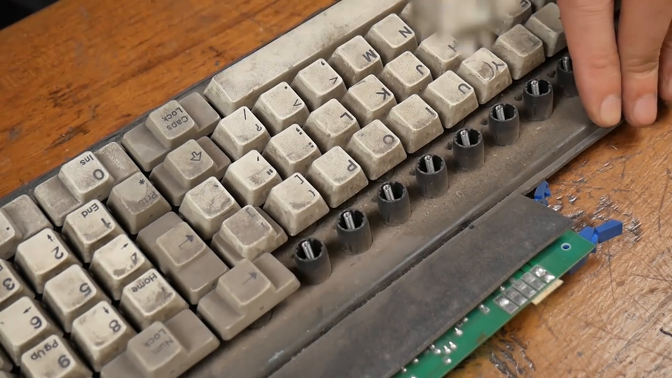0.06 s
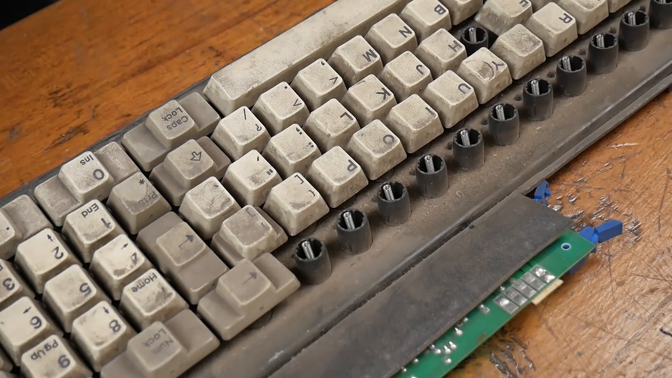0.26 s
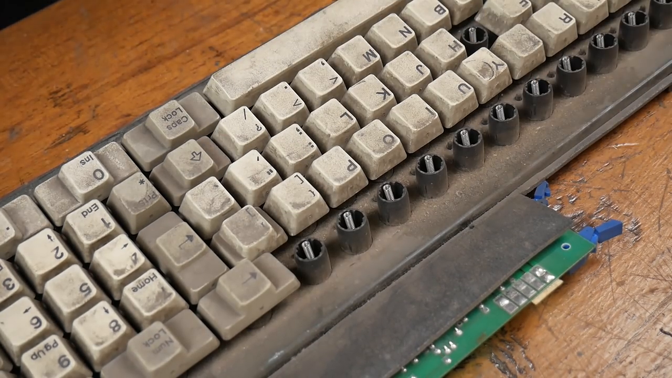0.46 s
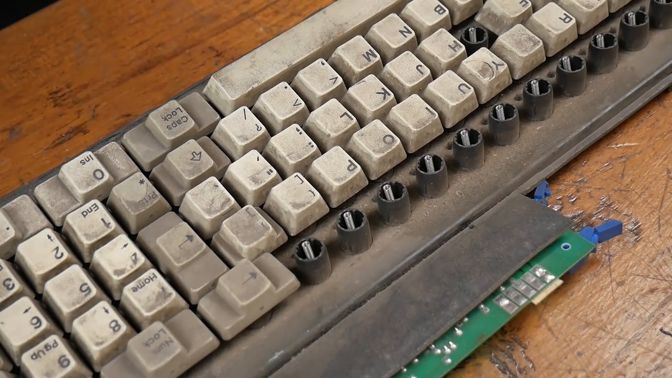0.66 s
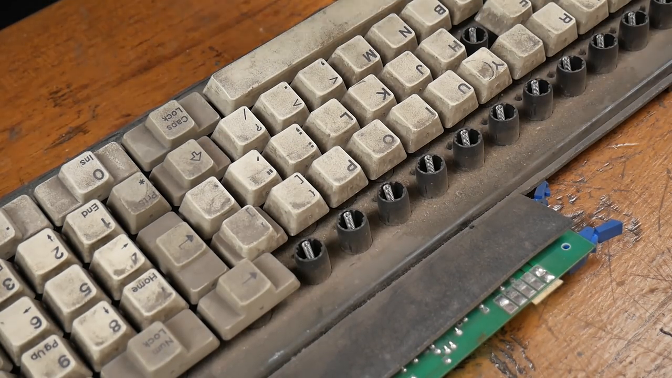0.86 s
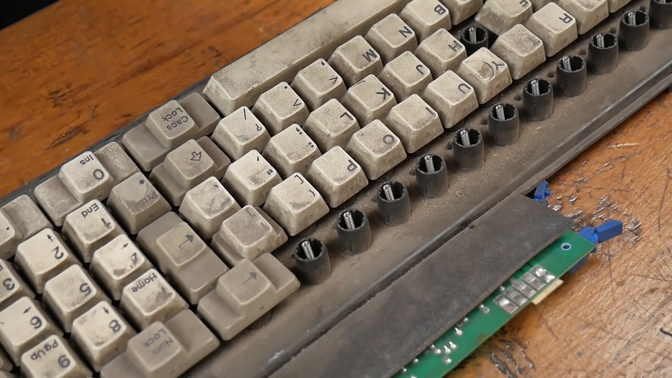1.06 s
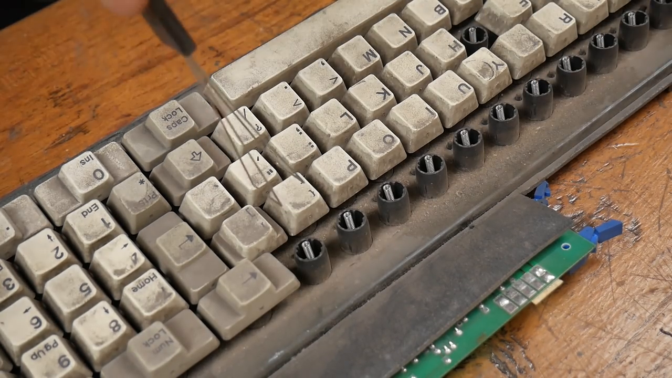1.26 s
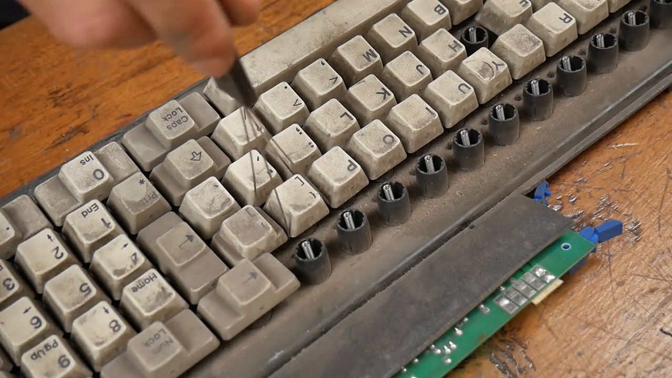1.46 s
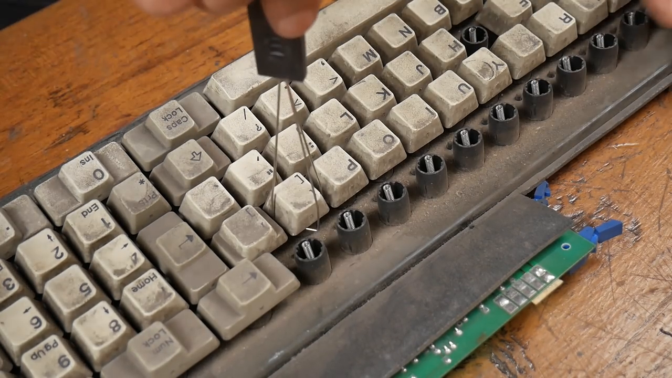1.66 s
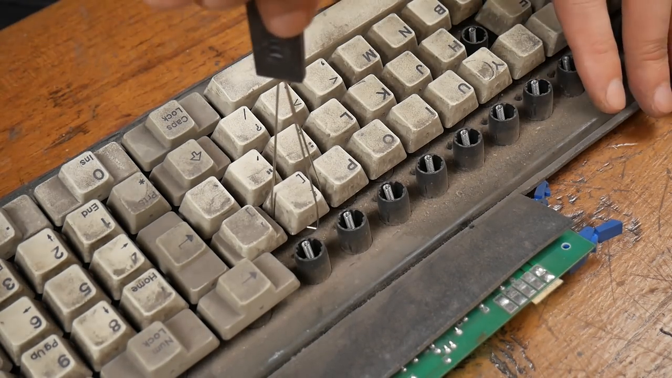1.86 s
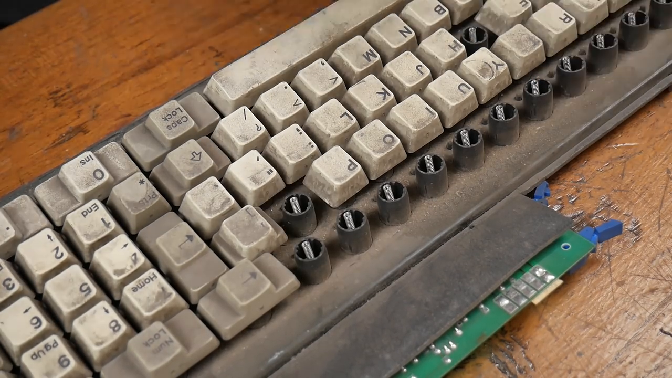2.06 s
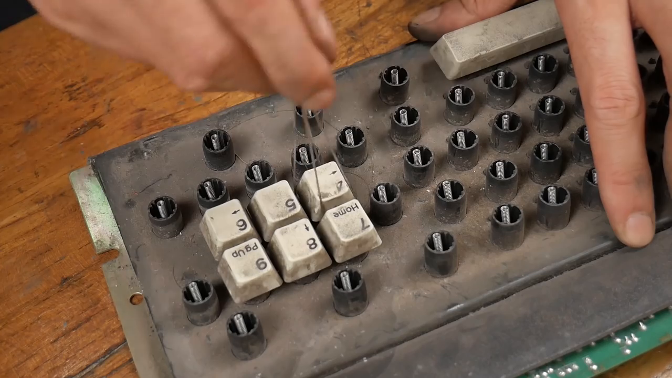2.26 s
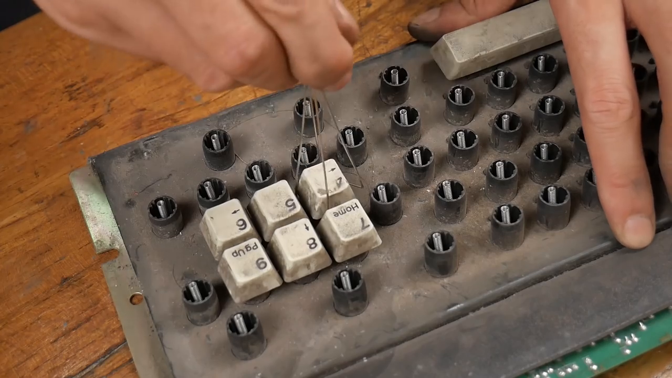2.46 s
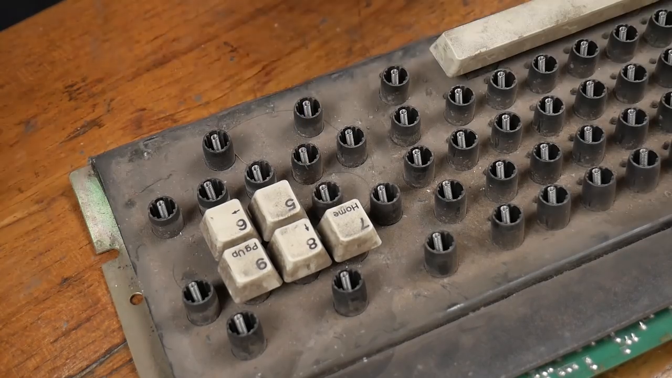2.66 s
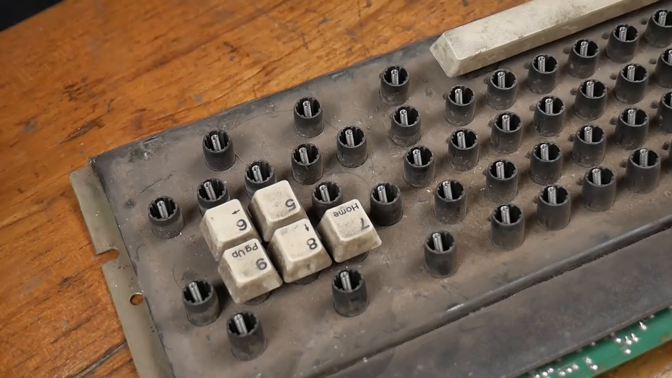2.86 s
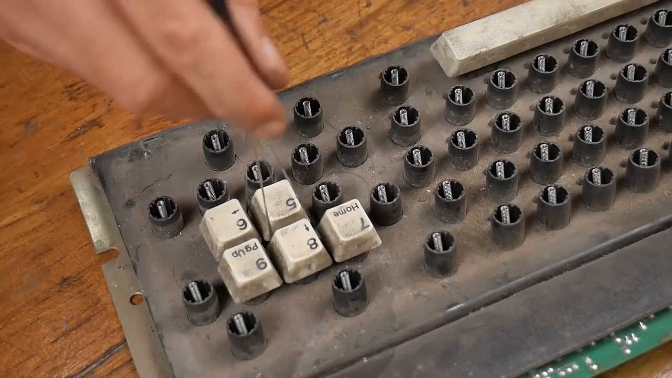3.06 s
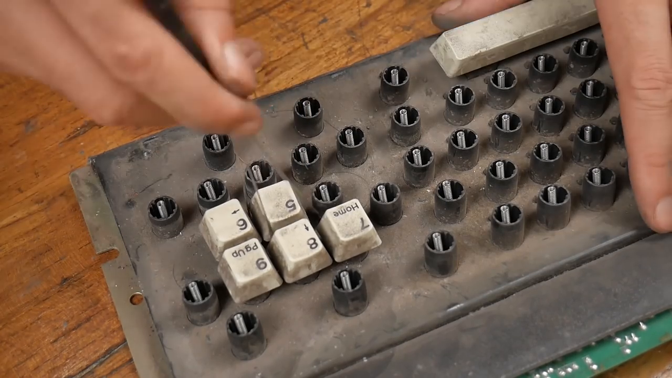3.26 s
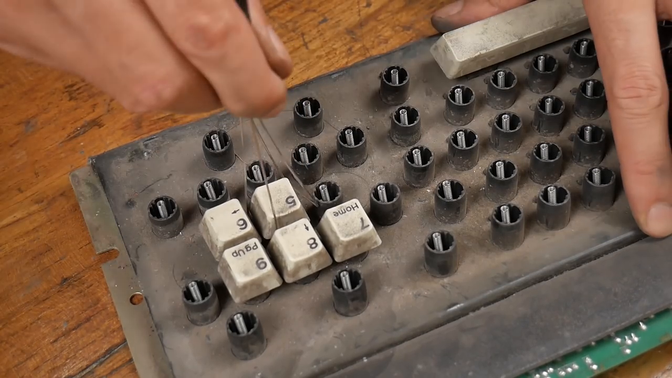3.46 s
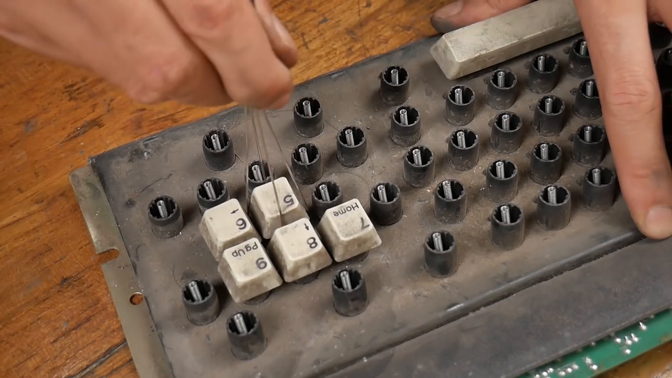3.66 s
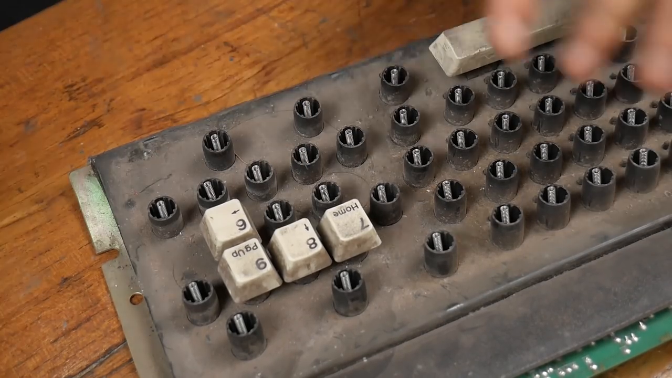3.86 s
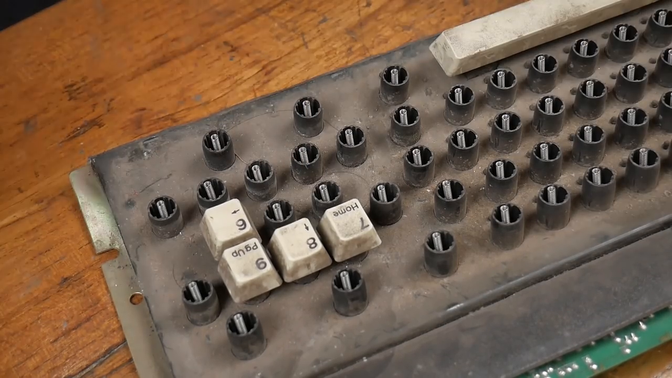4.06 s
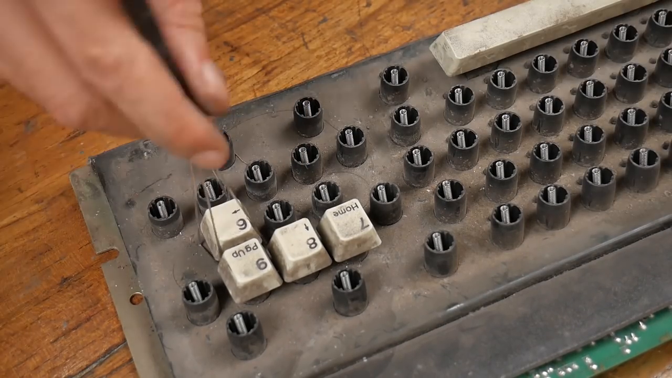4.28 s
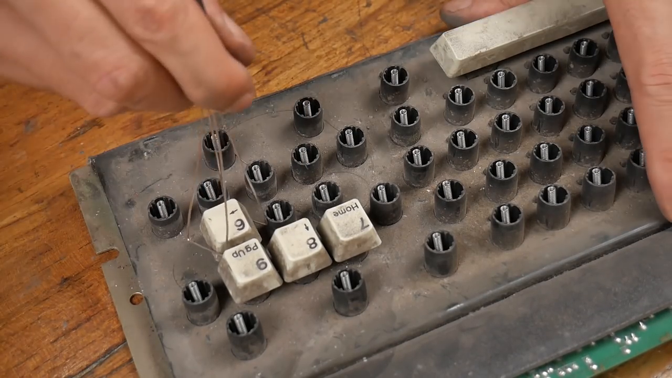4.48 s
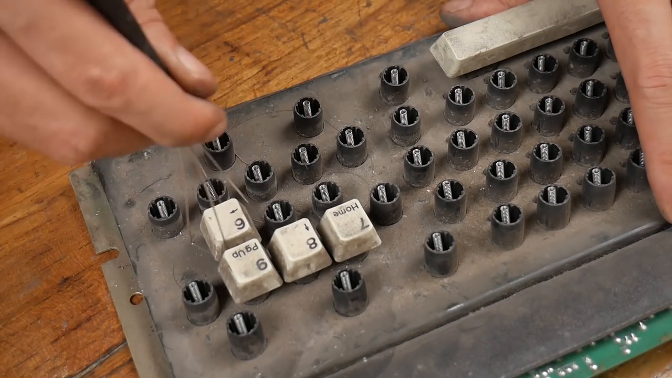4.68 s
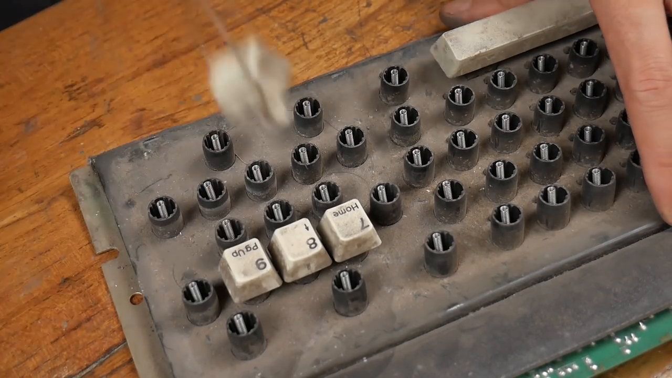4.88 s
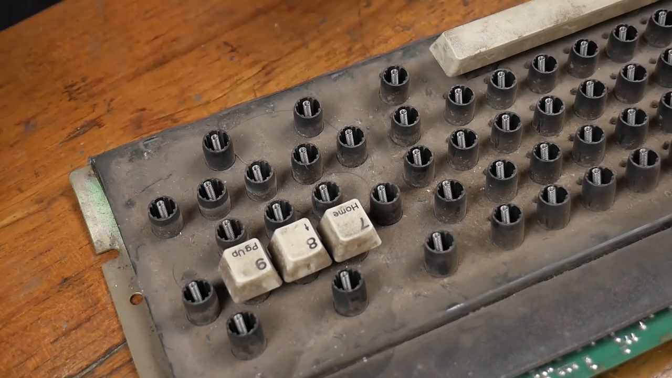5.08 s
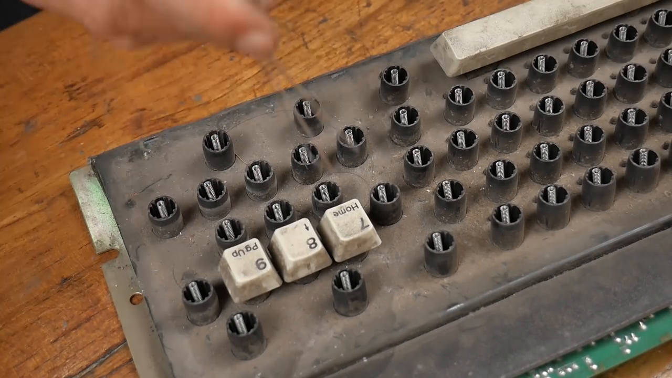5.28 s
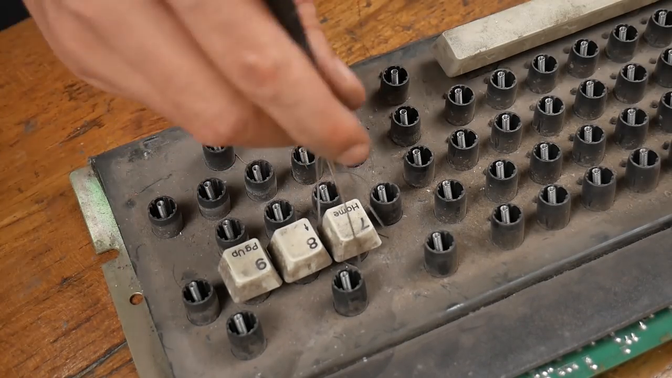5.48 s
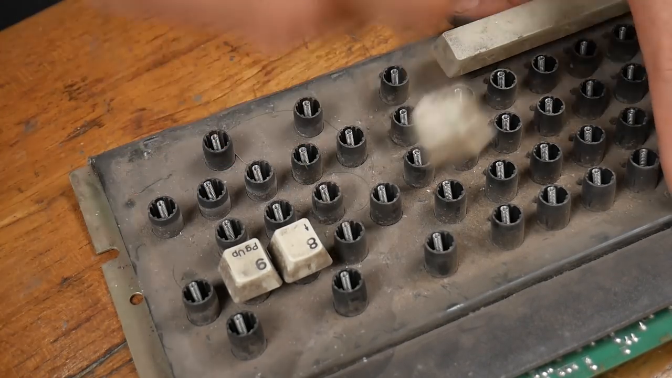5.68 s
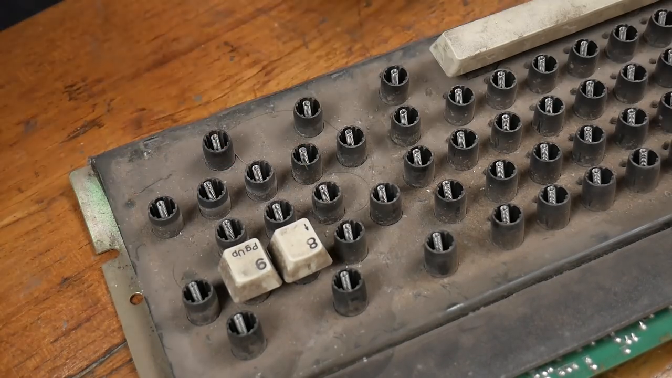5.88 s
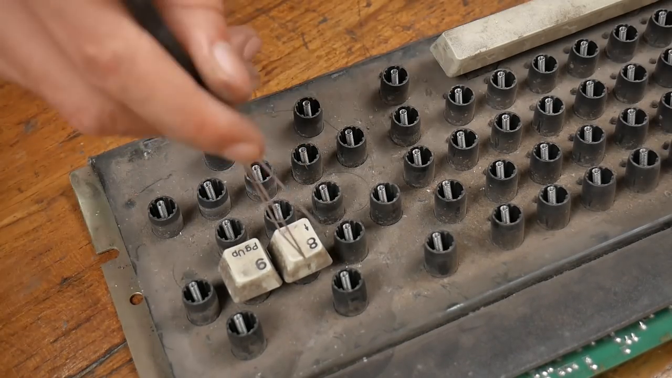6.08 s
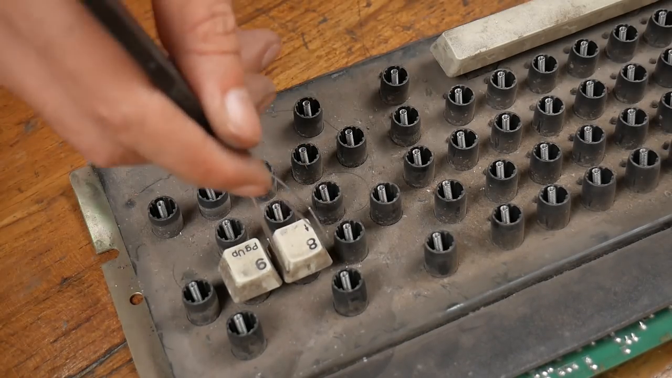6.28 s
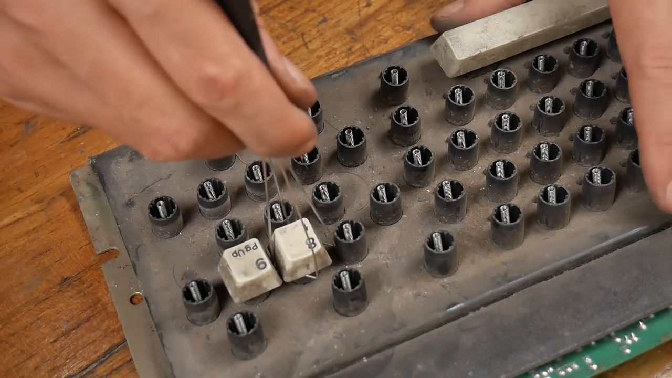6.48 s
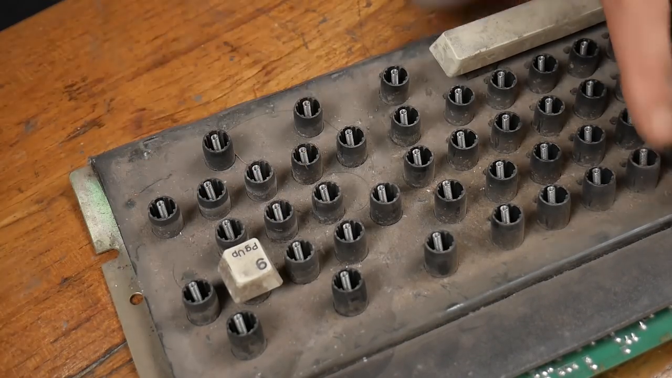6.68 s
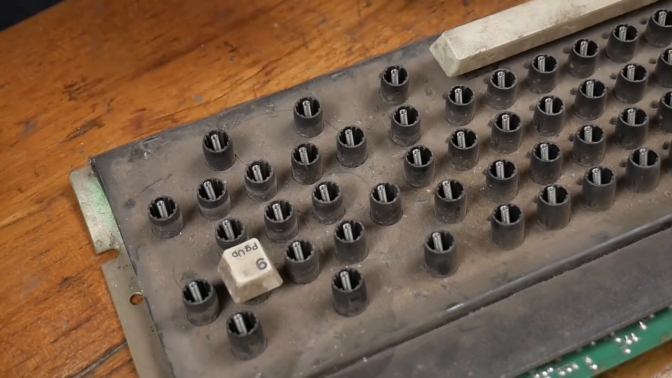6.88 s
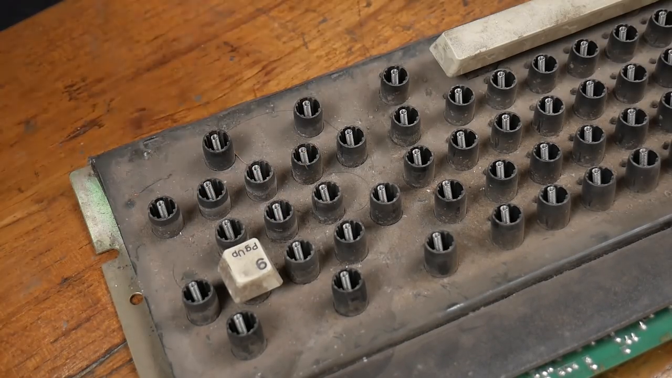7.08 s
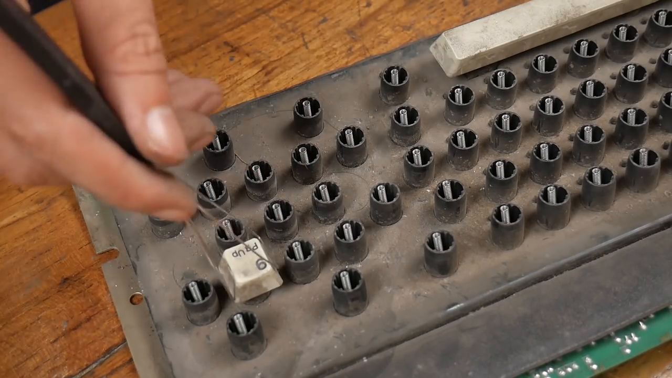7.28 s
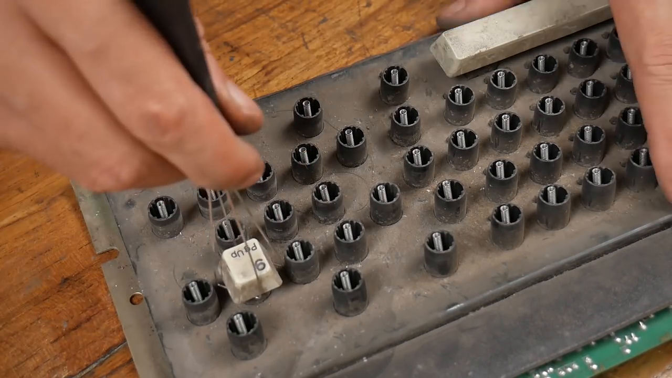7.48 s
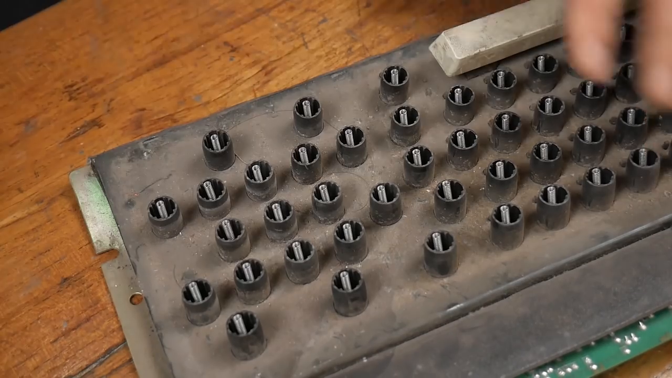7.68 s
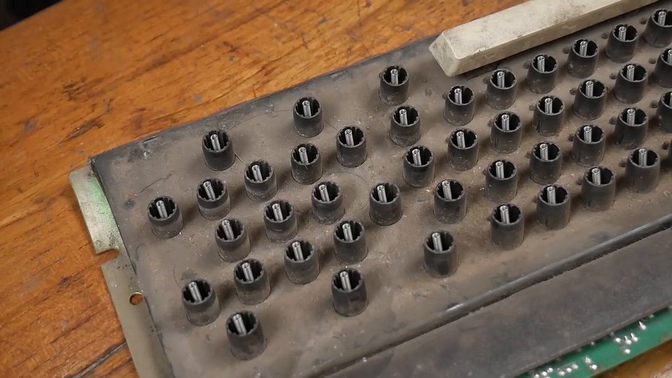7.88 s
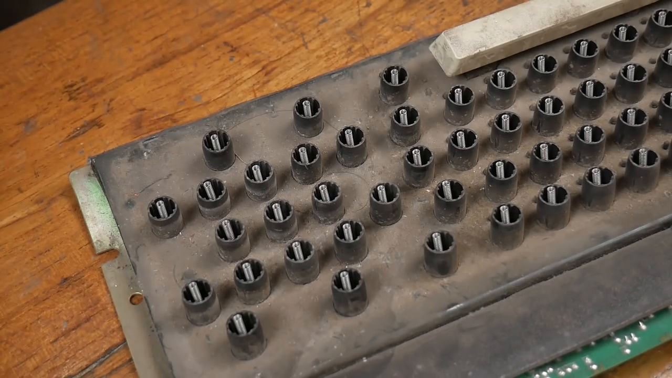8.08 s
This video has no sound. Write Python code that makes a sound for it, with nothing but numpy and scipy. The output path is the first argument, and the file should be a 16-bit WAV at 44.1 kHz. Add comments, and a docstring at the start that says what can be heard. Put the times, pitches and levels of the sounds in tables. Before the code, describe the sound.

Eight crisp plastic snaps come at uneven intervals of roughly one second, the first immediately. Between them a thin wire puller ticks, scratches and nudges the board with soft low bumps, and freed caps are set aside with light clicks. Each snap carries a short hollow wooden boom and a dull steel clatter. Close microphone, small room, very quiet air tone.

```python
"""Pulling keycaps off a keyboard

Eight plastic caps are worked off a bare mechanical keyboard with a wire puller, on a wooden desk. Slip bursts
through a cap's colour make the snaps and clicks, many small slips the scrapes, blurred sines the wire's pings.
Decaying modes make the desk boom and the steel plate ring as the board is nudged and drops back. Sparse
reflections add a small room, over shaped noise and faint fan tones."""
import sys
import numpy as np
from scipy import signal
from scipy.fft import rfft, irfft
from scipy.io import wavfile
from scipy.ndimage import uniform_filter1d

SR = 44100
rng = np.random.default_rng(int(sys.argv[2]) if len(sys.argv) > 2 else 0)


def dump(signal):
    """Clip the signal to [-1, 1] and save it as 16-bit WAV at the path in sys.argv[1]."""
    limited = np.clip(np.atleast_2d(signal).T, -1, 1)
    pcm = np.round(limited * 32767).astype(np.int16)
    wavfile.write(sys.argv[1], SR, pcm)


N = 358974  # length in samples
TAPS = 1024  # length of a cap's response in samples

# In the tables, brightness/dB tilts the treble per octave around 4500 Hz; -5.5 leaves it neutral.
# A cap snaps off its stem: [t/s, level/dB, strongest ring f/Hz, brightness/dB, strength of that ring/dB,
# jolt of the plate/dB, prying beforehand/s]
CAP_SNAPS = [(.0760, -29, 4970, -7.5, 4.5, -38.5, 0.0195), (1.9544, -27, 5140, -7.5, 10, -48, 0.51),
             (2.5486, -27, 4760, -3.5, 4, -41, 0.27), (3.7770, -29, 5050, -3.5, 5.5, -39, 0.79),
             (4.9275, -30, 7600, -4.5, 4.5, -42, .68), (5.7350, -28.5, 3560, -3.5, 8, -44, .33),
             (6.6320, -29, 3600, -4, 6.5, -42.5, .46), (7.6160, -28, 12400, -5.5, -1, -39.5, 0.27)]
# The wire catches on a cap, which clicks and nudges the board:
# [t/s, click level/dB, strongest ring f/Hz, brightness/dB, nudge level/dB]
WIRE_CATCHES = [(0.0601, -45.5, 3750, -15, -44), (0.9936, -54.5, 5700, -11, -48.5),
                (1.381, -64, 4750, -2, -46.5), (1.4325, -54, 4830, -6, -45), (1.5591, -59, 4200, -14, -40),
                (1.5965, -38, 7060, -5.5, -35), (1.667, -57, 4270, -12, -36), (1.8374, -56, 4580, -9, -50),
                (1.8745, -51.5, 3770, -11, -45.5), (2.222, -43.5, 4660, -5, -36.5),
                (2.335, -61, 4800, -9, -38.5), (2.3729, -56, 3300, -15, -34),
                (2.4738, -59.5, 12800, -7, -49.5), (2.5071, -37, 5430, -6.5, -36),
                (3.014, -56, 5060, -10, -41), (3.0647, -52, 5700, -7, -46), (3.100, -45.5, 8000, -7, -31.5),
                (3.1409, -45, 5500, -4.5, -38.5), (3.16, -72, 5400, -3, -33.5),
                (3.295, -45.5, 12000, -4, -38.5), (3.33, -42, 12700, -1.5, -34),
                (3.4354, -56.5, 4300, -15, -34.5), (3.4786, -55, 3450, -6.5, -59),
                (3.561, -32, 8700, -3.5, -33), (3.7216, -48, 10440, -7, -40.5),
                (4.259, -55, 2770, -17, -44), (4.334, -48, 13200, -9.5, -32),
                (4.3868, -42, 7900, -3.5, -28.5), (4.4512, -42, 8300, -3.5, -41),
                (4.6218, -45.5, 5370, -4, -35.5), (4.6399, -46, 8300, -1.5, -59),
                (4.7316, -47, 9700, -7, -29), (4.7554, -43, 9100, -4.5, -44),
                (4.829, -78, 4500, -17, -41.5), (4.919, -31, 9700, -2.5, -59),
                (5.3995, -44.5, 4560, -7, -39), (5.438, -47.5, 10700, -7.5, -36),
                (5.4798, -45, 3240, -13, -45), (5.515, -37.5, 13500, -5.5, -30.5),
                (5.617, -43, 4600, -5.5, -33), (5.6404, -46.5, 11200, -2.5, -48),
                (5.713, -49.5, 3480, -8, -41.5), (6.157, -50.5, 5300, -5, -45),
                (6.2511, -34, 4000, -6, -41.5), (6.2897, -49, 4840, -6, -36), (6.399, -55, 10400, 5, -29),
                (6.484, -57, 10000, -3.5, -32), (7.2999, -45.5, 5900, -10, -45),
                (7.372, -55, 9200, -6, -30), (7.462, -47.5, 12320, -4, -30.5),
                (7.5977, -43.5, 9200, -5, -39)]
# A pulled cap is taken out of the wire and put aside: [t/s, level/dB, strongest ring f/Hz, brightness/dB]
CAPS_PUT_ASIDE = [(0.48, -48, 10700, 5.5), (2.8346, -45, 8650, -1.5), (4.0791, -52.5, 8200, 5.5),
                  (5.203, -55, 6850, 5), (5.253, -60.5, 7100, 2), (5.993, -54.5, 6960, -.5),
                  (7.0729, -43, 5600, -1), (7.9704, -50.5, 10300, 0), (8.1144, -40, 8300, -8.5)]


def clicks(firm_db=-32, soft_db=-56, firm_s=0.0003, soft_s=0.0011):
    """The hard snap of each release, then catches, loose caps and bounces; a gentler contact slips for longer."""
    out = np.zeros(N)
    for s, db, ring_hz, bright_db, ring_db, *_ in CAP_SNAPS:
        snap = crack(ring_hz, bright_db, ring_db, slip_s=0.00065, chatter_s=0.0044, chatter_db=-8)
        add(out, s, amp(db) * snap)
    for s, db, ring_hz, bright_db, *_ in WIRE_CATCHES + CAPS_PUT_ASIDE + bounces():
        slip_s = np.interp(db, [soft_db, firm_db], [soft_s, firm_s])
        click = crack(ring_hz, bright_db, ring_db=7.0, slip_s=slip_s, chatter_s=0.0095, chatter_db=-12.0)
        add(out, s, amp(db) * click)
    return out


# The first cap is dropped on the desk, where its bounces get quicker and weaker
DROP_S, DROP_DB, DROP_RING_HZ, DROP_BRIGHT_DB, DROP_NUDGE_DB = .6973, -38.5, 5400, -8, -51
BOUNCE_S, BOUNCE_SHRINK, BOUNCE_LOSS_DB = 0.011, .85, 3.5  # first gap, ratio of gaps, loss per bounce


def bounces(count=8):
    """The clicks of the dropped cap: rows (t/s, level/dB, ring f/Hz, brightness/dB)."""
    gaps = BOUNCE_S * BOUNCE_SHRINK ** np.arange(count)
    times = DROP_S + np.r_[0, np.cumsum(gaps)]
    return [(s, DROP_DB - BOUNCE_LOSS_DB * k, DROP_RING_HZ, DROP_BRIGHT_DB) for k, s in enumerate(times)]


def crack(ring_hz, bright_db, ring_db, slip_s, chatter_s, chatter_db):
    """A burst of tiny slips, then brief chatter of loose parts; its energy equals 4 ms at rms 1."""
    t = np.arange(2 * TAPS) / SR
    slip = t / slip_s * np.exp(1 - t / slip_s)
    chatter = amp(chatter_db) * np.exp(-t / chatter_s)
    force = rfft((slip + chatter) * rng.choice([-1., 1.], len(t)), 4 * TAPS)
    force /= np.sqrt(uniform_filter1d(abs(force) ** 2, size=220))  # drives all pitches about equally
    burst = irfft(force)[:len(t)]
    sound = signal.fftconvolve(burst, keycap(ring_hz, bright_db, ring_db))
    return sound / np.sqrt(np.sum(sound ** 2) / (.004 * SR))


# Colour of a click on a plastic keycap: [f/Hz, level/dB]
KEYCAP_COLOUR = [(100, -49), (400, -5), (800, -10), (1400, -11.5), (2500, -6), (3300, 2), (4200, 1),
                 (5000, 4), (6500, 0.5), (8300, 0.5), (11000, -1), (13000, -3.5), (15000, -7), (17000, -24)]


def keycap(ring_hz, bright_db, ring_db, ring_octaves=0.15):
    """Causal response of a cap; the point of contact favours one ring and sets the brightness."""
    hz = np.fft.rfftfreq(TAPS, 1 / SR)
    ring = ring_db * np.exp(-(np.log2((hz + 1) / ring_hz) / ring_octaves) ** 2)
    tilt = (bright_db + 5.5) * np.clip(np.log2((hz + 1) / 4500), -.6, 1.7)
    db = read(KEYCAP_COLOUR, hz) + ring + tilt
    log_gain = np.log(amp(np.r_[db, db[-2:0:-1]]))
    return np.fft.ifft(np.exp(signal.hilbert(log_gain).conj())).real  # minimum phase


# A finger lands on the bare plate with a hollow knock: [t/s, level/dB]
FINGER_KNOCKS = [(3.436, -44)]


def thumps(drop_db=-19.5, soft_push_db=-27, grip_spread=0.097, grip_stiffness=1.046, count=7):
    """Each cap lets go at about the same pull, so the board recoils alike; hand-damped nudges are slower."""
    out = np.zeros(N)
    recoil = desk_boom(lag_s=.0012, swell_s=.0101)
    for s, *_, jolt_db, _ in CAP_SNAPS:
        add(out, s, amp(drop_db) * recoil)
        add(out, s, amp(jolt_db) * plate_ring(clatter_db=0.0))
    grips = []  # a tighter grip stiffens the board; a soft push hardly rings the plate
    for grip in np.linspace(-1, 1, count):
        stiffness = grip_stiffness + grip_spread * grip
        boom = desk_boom(lag_s=0.00076, swell_s=0.021, damping_db_per_s=217, stiffness=stiffness)
        nudge = boom / abs(boom).max()
        add(nudge, 0, amp(soft_push_db) * plate_ring(clatter_db=3))
        grips.append(nudge)
    for s, db in nudges():
        add(out, s, amp(db) * grips[rng.integers(count)])
    for s, db in FINGER_KNOCKS:
        add(out, s, amp(db) * plate_ring(clatter_db=-10))
    return out


NUDGE_LAG_S = 0.00205  # the board gives way just after the click
SETTLE_S, SETTLE_DB = .098, -45.5  # the board settles this long after each snap


def nudges():
    """Every soft push: catches, settling, the dropped cap and the rocking hand; rows (t/s, boom peak/dB)."""
    caught = [(s + NUDGE_LAG_S, db) for s, *_, db in WIRE_CATCHES]
    settling = [(s + SETTLE_S, SETTLE_DB) for s, *_ in CAP_SNAPS]
    dropped = [(DROP_S + NUDGE_LAG_S, DROP_NUDGE_DB)]
    return caught + settling + dropped + rocking()


def rocking(rocks_per_s=12, level_db=-46, spread_db=3):
    """The hand rocks the board at uneven moments while prying each cap: rows (t/s, boom peak/dB)."""
    times = np.concatenate([uneven(s - prying_s, s, rocks_per_s) for s, *_, prying_s in CAP_SNAPS])
    levels = level_db + spread_db * (2 * rng.random(len(times)) - 1)
    return list(zip(times, levels))


# Modes of the desk under the board: [f/Hz, relative level/dB, t60/s, direction of swing at the microphone (+-1)]
DESK_MODES = [(37, -40.5, 0.77, 1), (60.7, -30, 0.12, 1), (91.6, -35, 0.53, 1), (140.7, -33, 0.7, -1),
              (133.4, -2.1, .068, -1), (160.7, -2, .164, -1), (190.2, 4.1, .1225, 1),
              (210.2, -4.3, .127, 1), (261.7, -0.5, 0.037, -1)]


def desk_boom(lag_s, swell_s, damping_db_per_s=0, stiffness=1):
    """The heavy desk top takes a few cycles to get going; its close modes beat."""
    t = np.maximum(np.arange(SR // 2) / SR - lag_s, 0)
    ring = 0
    for hz, db, t60, way in DESK_MODES:
        swing = np.sin(2 * np.pi * hz * np.sqrt(stiffness) * t)
        ring = ring + np.sign(way) * amp(db - 60 * t / t60) * swing
    swell = 1 - np.exp(-(t / swell_s) ** 2)
    return ring * swell * amp(-damping_db_per_s * t)


# Modes of the keyboard's steel plate: [f/Hz, relative level/dB, t60/s]
STEEL_MODES = [(453, -20, 0.033), (510.6, -6.5, 0.08), (651, -13, 0.087), (897, -6, 0.03),
               (1205, -41.5, 0.27), (1850, -34.5, 0.04)]
# Its many weaker modes merge into a short clatter: [f/Hz, relative level/dB]
STEEL_CLATTER = [(60, -14), (200, 2), (330, 1), (560, -3), (800, -16.5), (1100, -17.5), (1800, -10.5),
                 (3000, -28.5), (8000, -58)]


def plate_ring(clatter_db, clatter_t60=0.069):
    """The plate answers at once with ringing modes; its many weaker modes clatter as decaying noise."""
    t = np.arange(SR // 4) / SR
    modes = 0
    for hz, db, t60 in STEEL_MODES:
        modes = modes + rng.choice([-1, 1]) * amp(db - 60 * t / t60) * np.sin(2 * np.pi * hz * t)
    clatter = unit(coloured(rng.standard_normal(len(t)), STEEL_CLATTER))
    return modes + clatter * amp(clatter_db - 60 * t / clatter_t60)


# The wire slides over plastic: [start t/s, firmest t/s, end t/s, level before trim/dB,
# strongest ring f/Hz (middle contact), brightness/dB]
WIRE_SCRAPES = [(0.279, 0.32, .47, -72, 11500, -2), (1.42, 1.613, 1.69, -62, 4570, -5.5),
                (1.7, 1.715, 1.74, -62.5, 11800, -1), (2.239, 2.32, 2.41, -71.5, 3350, -15),
                (3.04, 3.075, 3.19, -57, 5650, -10.5), (3.189, 3.277, 3.3, -65, 4050, -12),
                (4.249, 4.352, 4.39, -53.5, 8350, -8), (4.51, 4.54, 4.55, -61.5, 10000, -8.5),
                (5.425, 5.53, 5.59, -48, 3170, -8.5), (6.235, 6.391, 6.49, -55.5, 3140, -9.5),
                (6.535, 6.546, 6.58, -63, 8100, -4.5), (7.292, 7.292, 7.43, -55, 14500, -8),
                (7.497, 7.512, 7.535, -59, 7400, -2), (7.793, 7.835, 7.96, -69.5, 10600, -6)]
# The freed cap shifts in the wire as the board settles: length, then as in the table
SHIFT_S, SHIFT_DB, SHIFT_RING_HZ, SHIFT_BRIGHT_DB = 0.033, -60, 8600, -5
SLIPS_PER_S, SLIP_SPREAD_DB, CONTACTS = 520, 5.5, 8  # slips of all contacts together
SCRAPE_ENDS_DB = -13.5  # a stroke starts and ends lighter
UNEVEN_PRESS_DB = 3  # the pressure wavers, so the slips swell and fade in clumps


def scrapes(trim_db=-0.5, scatter_octaves=0.31):
    """Stick and slip: uneven ticks at several points of contact, each with its own short ring."""
    out = np.zeros(N)
    shift_times = SETTLE_S + SHIFT_S * np.array([0, .5, 1])
    shifts = [(*(s + shift_times), SHIFT_DB, SHIFT_RING_HZ, SHIFT_BRIGHT_DB) for s, *_ in CAP_SNAPS]
    for start, firmest, end, db, ring_hz, bright_db in WIRE_SCRAPES + shifts:
        n = max(round((end - start) * SR), 64)
        sizes = amp(SLIP_SPREAD_DB * np.minimum(rng.exponential(1, (CONTACTS, SR // 2)), 3))
        slips = sizes * (rng.random(sizes.shape) < SLIPS_PER_S / CONTACTS / SR)
        waver = unit(uniform_filter1d(rng.standard_normal(SR // 2), size=500))[:n]
        stroke = signal.windows.tukey(n, .1) * amp(UNEVEN_PRESS_DB * waver)
        rings_hz = ring_hz * 2 ** (scatter_octaves * np.linspace(-1, 1, CONTACTS))
        ticks = [crack(hz, bright_db, ring_db=5, slip_s=0.00097, chatter_s=0.00244, chatter_db=1.5)
                 for hz in rings_hz]
        sound = signal.fftconvolve(slips[:, :n] * stroke, np.array(ticks), axes=1).sum(0)
        sound = sound / np.sqrt(np.sum(sound ** 2) / n + 1e-20)
        t = start + np.arange(len(sound)) / SR
        press_db = np.interp(t, [start, firmest, end], [SCRAPE_ENDS_DB, 0, SCRAPE_ENDS_DB])
        add(out, start, amp(db + trim_db + press_db) * sound)
    return out


# The wire pings as it is pushed down between close-set caps: [t/s, peak level/dB, f/Hz]
WIRE_PINGS = [(1.382, -36, 4840), (1.431, -39.5, 4440), (1.49, -38.5, 4480), (1.592, -32, 4300),
              (1.630, -31, 4260), (1.640, -33.5, 4460)]
FAINT_PING_HZ, FAINT_PING_SPREAD, FAINT_PING_DB = 4370, 0.07, -47.5  # spread is a fraction of the pitch
FAINT_PINGS_PER_S = 80


def pings(t60=0.013, width_hz=700, rise_s=0.00038):
    """The wire buzzes against the caps, which blur its ring and soon damp it; fainter pings fall between."""
    out, t = np.zeros(N), np.arange(2 * TAPS) / SR
    faint = []
    for s in uneven(WIRE_PINGS[1][0], WIRE_PINGS[-1][0], FAINT_PINGS_PER_S):
        detune = 1 + FAINT_PING_SPREAD * (2 * rng.random() - 1)
        faint.append((s, FAINT_PING_DB, FAINT_PING_HZ * detune))
    for s, db, hz in WIRE_PINGS + faint:
        buzz = np.cumsum(rng.standard_normal(len(t))) * np.sqrt(width_hz / SR)
        blur = uniform_filter1d(buzz, size=18) * np.sqrt(np.pi)
        ring = np.sin(2 * np.pi * hz * t + blur)
        add(out, s, ring * amp(db - 60 * t / t60) * (1 - np.exp(-t / rise_s)))
    return out


# How long the room rings: [f/Hz, t60/s]
REVERB_T60 = [(200, 0.33), (1000, 0.4), (5000, 0.28), (10000, 0.3), (16000, 0.22)]
# How strongly it answers, against the direct sound: [f/Hz, level/dB]
REVERB_GAIN = [(150, -18), (500, -7.5), (2000, -16.5), (5000, -17), (10000, -17), (16000, -11)]


def room(x, first_s=0.003):
    """Sparse reflections of random sign, each band dying at its own speed."""
    n = SR // 2
    hits = (rng.random(n) < 5000 / SR) * (np.arange(n) > first_s * SR)  # about 5000 reflections a second
    taps = rng.choice([-1., 1.], n) * hits
    hz, t, bands = signal.stft(unit(taps), SR, nperseg=256)
    t60 = read(REVERB_T60, hz)[:, None]
    decay = amp(read(REVERB_GAIN, hz)[:, None] - 60 * t / t60)
    even_energy = np.sqrt(2 * np.log(1000) / (t60 * SR))  # the gain holds whatever the decay time
    reverb = signal.istft(bands * decay * even_energy, SR, nperseg=256)[1]
    return signal.fftconvolve(x, reverb)[:N]


# Colour of room tone and microphone hiss: [f/Hz, relative level per Hz/dB]
ROOM_TONE = [(20, -6), (45, 1), (90, -11.5), (190, 3), (290, -10.5), (400, -3.5), (600, -12), (950, -9.5),
             (2000, -18.5), (5000, -20.5), (8500, -29.5), (11300, -15), (12500, -28), (16000, -48)]
# Tones of a distant fan: [f/Hz, rms level/dB]
FAN_TONES = [(360.5, -78.5), (436, -83)]


def background(air_db=-72.5, waver_hz=0.96):
    """Steady room tone and hiss from shaped noise, with faint fan tones wavering in pitch."""
    out = amp(air_db) * unit(coloured(rng.standard_normal(N), ROOM_TONE))
    for hz, db in FAN_TONES:
        drift = waver_hz * unit(uniform_filter1d(rng.standard_normal(N), size=8000))
        out += amp(db) * unit(np.sin(2 * np.pi * np.cumsum(hz + drift) / SR))
    return out


def amp(db):
    """Decibels to gain."""
    return 10 ** (np.asarray(db) / 20)


def unit(x):
    """Scales to rms 1."""
    return x / np.sqrt(np.mean(x ** 2) + 1e-20)


def read(points, hz):
    """Reads a table on a log-frequency axis."""
    f, value = np.transpose(points)
    return np.interp(np.log(hz + 1), np.log(f), value)


def coloured(x, points):
    """Filters a sound by the spectrum of a table."""
    gain = amp(read(points, np.fft.rfftfreq(len(x), 1 / SR)))
    return irfft(rfft(x) * gain, len(x))


def uneven(start, end, per_s):
    """Moments at a loose pace: one at a random place in each beat."""
    count = max(round((end - start) * per_s), 1)
    return start + (end - start) * (np.arange(count) + rng.random(count)) / count


def add(mix, s, sound):
    """Mixes a sound in at time s."""
    part = mix[max(round(s * SR), 0):][:len(sound)]
    part += sound[:len(part)]


def scene():
    """All the handling sounds, their reflections in the room and the background."""
    near = clicks() + thumps() + scrapes() + pings()
    return (near + room(near) + background())[None]


def record(dry, edge_hz=16100):
    """Band limit: a steep low-pass removes the top of the treble."""
    lowpass = signal.firwin(255, edge_hz, window=("kaiser", 9), fs=SR)
    return signal.oaconvolve(dry, lowpass[None], "same")


dry = scene()
out = record(dry)
dump(out)
```